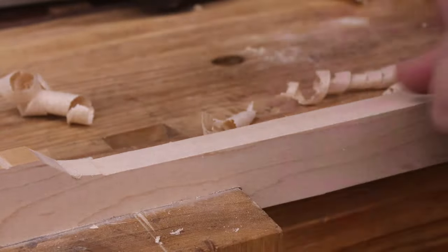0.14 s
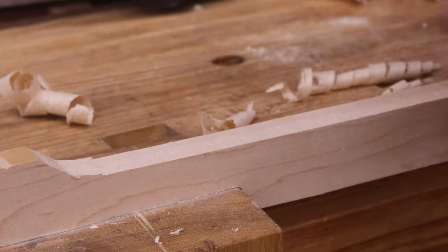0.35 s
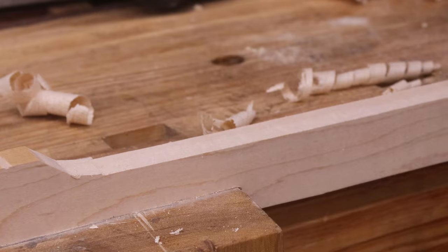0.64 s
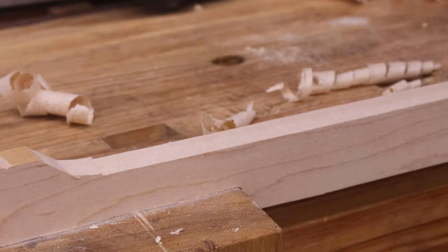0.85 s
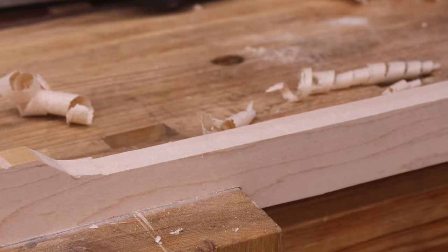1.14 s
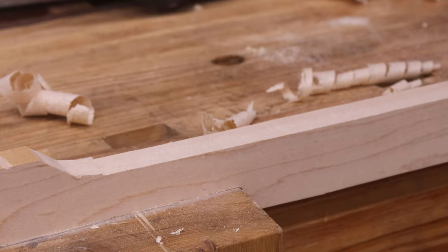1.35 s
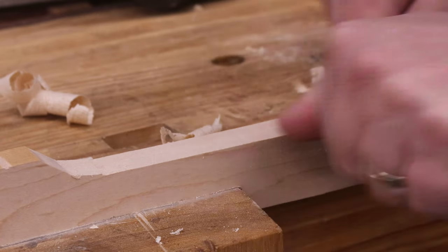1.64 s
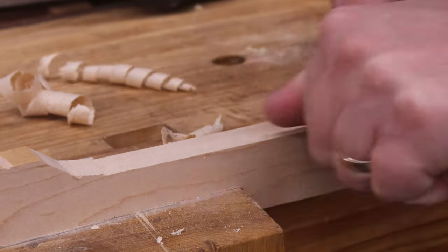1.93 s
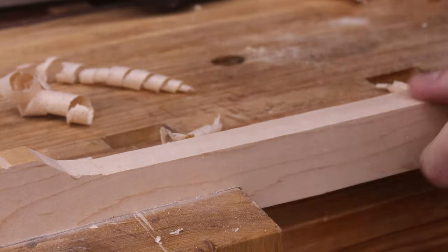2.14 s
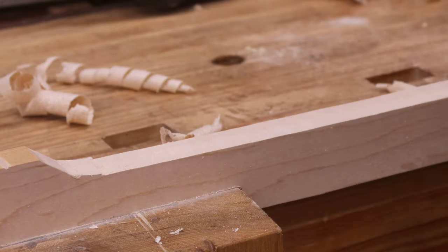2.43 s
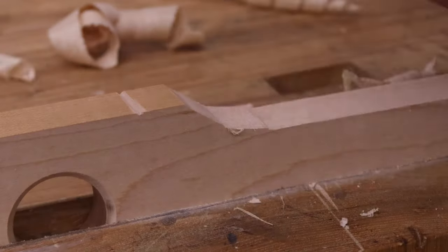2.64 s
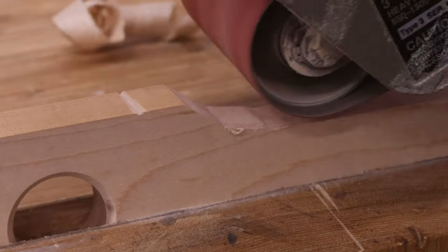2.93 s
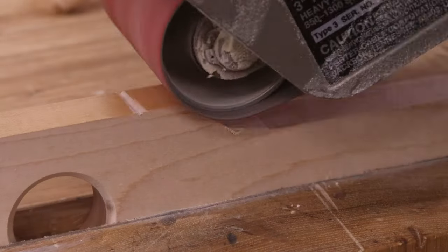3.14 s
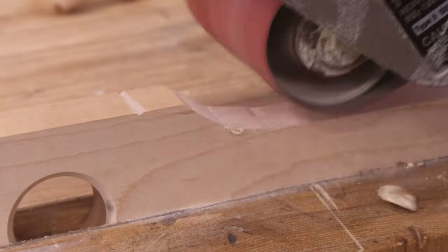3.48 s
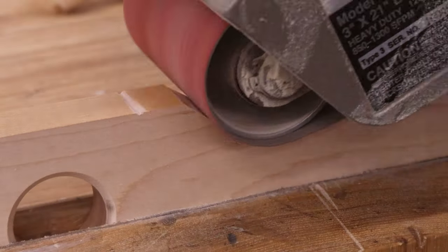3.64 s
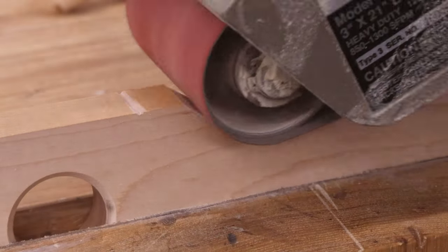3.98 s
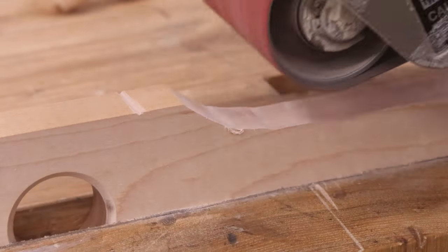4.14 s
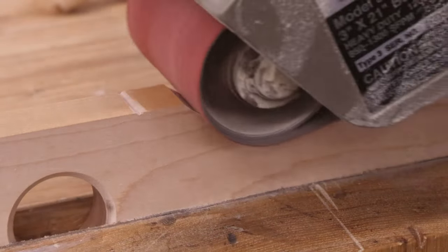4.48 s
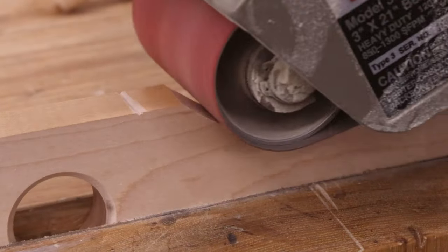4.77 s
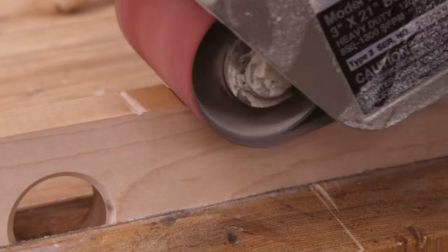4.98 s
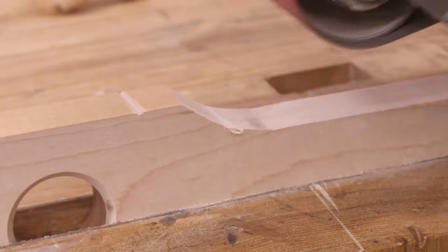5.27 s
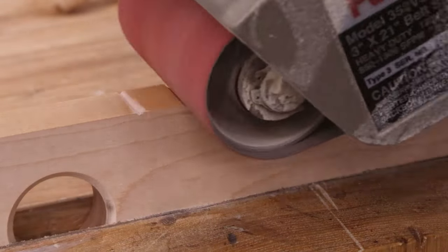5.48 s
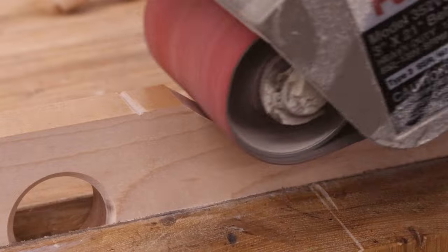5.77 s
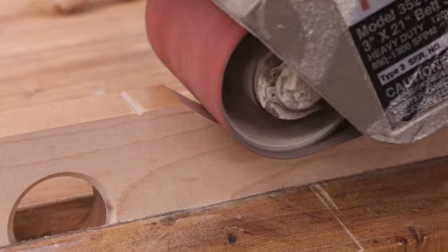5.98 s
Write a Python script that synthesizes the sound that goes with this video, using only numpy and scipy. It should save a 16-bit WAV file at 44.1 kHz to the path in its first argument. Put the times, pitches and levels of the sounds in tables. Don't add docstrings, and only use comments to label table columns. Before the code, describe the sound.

A hand blade scrapes and chatters wood shavings off a board, knocks down on the bench, then a belt sander clicks on and whines loudly.

```python
import sys
import numpy as np
from scipy import signal
from scipy.fft import rfft, irfft
from scipy.io import wavfile
from scipy.ndimage import uniform_filter1d

SR = 44100
rng = np.random.default_rng(int(sys.argv[2]) if len(sys.argv) > 2 else 0)


def voltage_ratio(level):
    return 10 ** (np.asarray(level, float) / 20)


def unload_wav(signal):
    wavfile.write(
        sys.argv[1],
        SR,
        np.round(np.clip(np.atleast_2d(signal).T, -1, 1) * 32767).astype(np.int16),
    )


N = 269451
TIME, FREQ = np.arange(N) / SR, np.fft.rfftfreq(N, 1 / SR) + 1
SWITCH_S = 2.8008


def unit(x):
    return x / np.sqrt(np.mean(x ** 2))


def colour(points):
    hz, db = np.transpose(points)
    return unit(voltage_ratio(np.interp(np.log(FREQ), np.log(hz), db)))


def ringing(modes):
    return sum(voltage_ratio(db) / (1 + 1j * (FREQ - hz * hz / FREQ) / max(width, 30)) for hz, width, db in modes)


def through(x, gain):
    return irfft(rfft(x) * gain, N)


def walk(rate):
    hold = int(SR / rate)
    steps = np.repeat(rng.standard_normal(N // hold + 1), hold)
    return unit(uniform_filter1d(uniform_filter1d(steps, hold), hold)[:N])


def fibres(rate, spread_db):
    hold = int(SR / rate)
    sizes = np.minimum(rng.exponential(size=N // hold + 1), 4)
    return unit(rng.standard_normal(N) * np.repeat(voltage_ratio(spread_db * sizes), hold)[:N])


# (start [s], length [s], cut level [dB], fibre hiss minus cut [dB], board boom minus cut [dB])
STROKES = [(0, 0.012, -50.5, -4, -12), (0.077, 0.21, -48, -9.5, 2), (0.17, 0.087, -44, -16, 6),
           (0.254, 0.085, -39.5, -13.5, -0.5), (0.451, 0.19, -42, -7, 2.5),
           (0.558, 0.097, -34.5, -12.5, -11), (0.734, 0.077, -31.5, -24, -11.5),
           (0.873, 0.057, -31.5, -17, -10), (0.938, 0.051, -32, -24, -14), (0.984, 0.14, -37.5, -17, -8),
           (1.158, 0.33, -40.5, -21, -4.5), (1.465, .2, -41, -18, -5.5), (1.693, 0.076, -37.5, -13.5, -5),
           (1.805, 0.15, -47.5, -6.5, 11.5), (1.916, 0.16, -34, -10, 2.5), (2.096, 0.2, -79, -18, 7),
           (2.342, 0.044, -63, 1, -16), (2.427, 0.068, -64.5, 4.5, -6), (2.602, 0.065, -53, -1, -1),
           (2.668, 0.084, -57.5, 0.5, -9)]
ATTACK_S, RELEASE_S, BUILD_DB = 0.024, 0.02, -0.5
HISS_ATTACK_SHARE, HISS_RELEASE_S = 0.3, .006
SPLINTER_DB, SPLINTER_SLOPE = 1.5, 1.7


def stroke_pressure():
    push = 0
    for start, length, cut_db, hiss_db, boom_db in STROKES:
        u = TIME - start
        slow = max(HISS_ATTACK_SHARE * length, ATTACK_S)
        attack = np.array([[ATTACK_S], [ATTACK_S], [slow], [slow]])
        release = np.array([[RELEASE_S], [RELEASE_S], [HISS_RELEASE_S], [HISS_RELEASE_S]])
        shape = np.clip(u / attack, 0, 1) * np.exp(-np.maximum(u - length, 0) / release)
        shape = shape * voltage_ratio(cut_db + BUILD_DB * (np.clip(u / length, 0, 1) - .5))
        splinter_db = SPLINTER_SLOPE * hiss_db + SPLINTER_DB
        drive_db = np.array([[boom_db - 4.5], [-4.0], [hiss_db + .5], [splinter_db]])
        push = np.hypot(push, voltage_ratio(drive_db) * shape)
    return push


# (peak time [s], level [dB], ring [Hz], half length [s])
CATCHES = [(0.075, -36.5, 890, 0.0043), (0.19, -40.5, 2780, 0.011), (0.229, -39, 3160, 0.0055),
           (0.279, -41, 2270, 0.0069), (0.31, -36.5, 1580, .0033), (0.337, -32.5, 560, 0.0056),
           (.345, -68, 3630, 0.0034), (0.362, -55, 3600, .002), (0.513, -51, 3600, .0015),
           (0.468, -39, 895, .0034), (0.529, -39, 1830, 0.0094), (0.555, -38, 2160, 0.0041),
           (0.61, -33, 2430, .003), (0.621, -28.5, 1580, 0.0039), (0.634, -31, 820, 0.0045),
           (0.777, -28.5, 2570, 0.0066), (0.8, -32.5, 1290, 0.0037), (1.76, -36, 820, 0.0059),
           (1.837, -34, 820, 0.013), (1.973, -40, 810, 0.016), (2.025, -32.5, 2160, 0.013),
           (2.08, -33.5, 760, .0062)]
# (peak time [s], level [dB], ring [Hz], half length [s])
CHATTER = [(0.868, -29, 820, 0.0038), (0.885, -29.5, 2060, 0.0034), (0.904, -32.5, 2450, 0.0034),
           (0.949, -27.5, 2570, 0.0017), (0.967, -31, 820, 0.0019), (1.002, -27.5, 2700, 0.0037),
           (1.054, -31.5, 820, 0.0026), (1.079, -24.5, 2540, 0.0024), (1.14, -31.5, 1600, .005),
           (1.175, -32, 1770, 0.006), (1.219, -36, 1670, 0.0023), (1.259, -32.5, 2470, 0.0075),
           (1.305, -33, 810, 0.0041), (1.347, -28.5, 2190, 0.0049), (1.404, -36.5, 1720, 0.0047),
           (1.438, -31, 1620, 0.0046), (1.484, -41, 850, .0036), (1.525, -28.5, 1850, 0.006),
           (1.566, -28.5, 2750, 0.0013), (1.615, -38.5, 860, 0.0052), (1.646, -38.5, 1390, .0059)]
# (peak time [s], level [dB], ring [Hz], half length [s])
KNOCKS = [
    (2.16, -64, 2310, 0.0027),
    (2.328, -48.5, 2760, 0.0034),
    (2.357, -44, 1050, 0.0033),
    (2.376, -41.5, 2350, 0.0017),
    (2.449, -53.5, 2500, 0.0048),
    (2.48, -58, 4600, 0.0065),
    (2.568, -53, 3770, 0.0079),
    (2.628, -35, 1450, 0.0014),
    (2.64, -47.5, 3150, 0.0035),
    (2.714, -48, 2750, 0.004),
]
# (frequency [Hz], width [Hz], level [dB])
BOARD = [(154.3, 23, 5), (253, 24, 2.5), (411, 11, -10.5), (511, 72, -2.5), (820, 87, 3), (983, 40, 2),
         (1636, 230, -8), (2190, 66, -6), (2700, 160, -10.5), (3580, 260, 4.5)]
# (frequency [Hz], level [dB])
BOOM = [(40, -17), (95, -8.5), (150, -12), (250, -6), (500, -1.5), (800, -55), (1500, -67)]
# (frequency [Hz], level [dB])
CUT = [(300, -30), (600, 2), (900, -4), (1600, 1.5), (2700, 1), (3400, -16), (5000, -28)]
# (frequency [Hz], level [dB])
HISS = [(2000, -3), (3500, 4.5), (5000, 1.5), (8000, -13.5), (11000, -50)]
# (frequency [Hz], level [dB])
AIR = [(6000, -7), (9000, 2.5), (12000, -4), (16000, -7.5)]
CATCH_BOOM_DB, KNOCK_BOOM_DB = -7.5, -18
CATCH_HISS_DB, HISS_DB_PER_OCT = -13, 16.5
RING_DB, RING_WIDTH, BOARD_MIX = -5, .08, .3


def spokeshave():
    push = stroke_pressure() * voltage_ratio(2.3 * walk(45))
    tear, rings = fibres(rate=1600, spread_db=0.9), np.zeros(N)
    for table, boom_db in ((CATCHES, CATCH_BOOM_DB), (CHATTER, CATCH_BOOM_DB), (KNOCKS, KNOCK_BOOM_DB)):
        for peak, db, hz, length in table:
            span = slice(int((peak - .05) * SR), int((peak + 0.13) * SR))
            u = (TIME[span] - peak) / max(length, .001)
            swell = np.exp(-np.where(u < 0, u, 0.39 * u) ** 2 / 2)
            crisp = np.exp(-np.where(u < 0, u, 0.57 * u) ** 2 / 2)
            hiss_db = db + CATCH_HISS_DB + HISS_DB_PER_OCT * np.log2(hz / 2500)
            drive_db = np.array([[db + boom_db - .5], [db - 3.0], [hiss_db + .5], [hiss_db - 9.5]])
            swells = np.array([swell, swell, crisp, crisp])
            push[:, span] = np.hypot(push[:, span], voltage_ratio(drive_db) * swells)
            b, a = signal.iirpeak(hz, 1 / RING_WIDTH, SR)
            rings[span] += voltage_ratio(db + RING_DB) * unit(signal.lfilter(b, a, tear[span])) * swell
    body = ringing(BOARD)
    body = body + BOARD_MIX * np.abs(body).max()
    boom, cut = colour(BOOM) * body, colour(CUT) * body
    boom = boom / np.sqrt(np.mean(np.abs(boom) ** 2))
    cut = cut / np.sqrt(np.mean(np.abs(cut) ** 2))
    snaps = fibres(rate=2500, spread_db=2.7)
    hiss = through(push[2] * snaps, colour(HISS))
    splinters = through(push[3] * snaps, colour(AIR))
    return through(push[0] * tear, boom) + through(push[1] * tear, cut) + hiss + splinters + rings


# (time [s], commutator rate once at speed [Hz], whine level [dB])
MOTOR = [(3.0, 3858, -40), (3.3, 3862, -45.5), (3.5, 3818, -49), (3.6, 3900, -43), (3.7, 3965, -39.5),
         (4.1, 3800, -48.5), (4.2, 3923, -41), (4.3, 3940, -40.5), (4.6, 3800, -52.5), (4.7, 3888, -41),
         (4.8, 3954, -40), (5.3, 3670, -51), (5.35, 3830, -40), (5.42, 3890, -44), (5.5, 3944, -49),
         (5.65, 3833, -41), (5.82, 3960, -45), (6.11, 3778, -41.5)]
# (level at free speed [dB], slope [dB per 100 Hz], added by starting current [dB])
WHINE = [(-56.5, 2, -5), (-64, 3.5, 1)]
RUN_UP_FROM_S, RUN_UP_S, FREE_HZ = 2.747, .142, 3858
TEETH_DB, TEETH_DB_PER_100HZ, TEETH_START_DB = -33.5, -1.8, -6
HOUSING_HZ, HOUSING_WIDTH_HZ, HOUSING_DB = 7364, 177, 7.8


def motor():
    reached = np.tanh(np.maximum(TIME - RUN_UP_FROM_S, 0) / RUN_UP_S)
    times, speeds, levels = np.transpose(MOTOR)
    speed_hz = np.interp(TIME, times, speeds)
    bar_hz = speed_hz * reached
    over = (speed_hz - FREE_HZ) / 100
    starting = 1 - reached ** 8
    whine_db = [np.interp(TIME, times, levels)]
    for harmonic, (db, slope, start_db) in enumerate(WHINE, 2):
        lift = HOUSING_DB * np.exp(-((harmonic * bar_hz - HOUSING_HZ) / HOUSING_WIDTH_HZ) ** 2)
        wander = 2.8 * walk(8)
        whine_db.append(db + slope * over + start_db * starting + wander + lift)
    tooth_db = TEETH_DB + TEETH_DB_PER_100HZ * over + TEETH_START_DB * (1 - reached ** 2)
    return bar_hz, whine_db, tooth_db


def tone(hz, db, flicker_db, wobble=.3):
    phase = 2 * np.pi * np.cumsum(hz) / SR + wobble * walk(120)
    return np.sqrt(2) * voltage_ratio(db + flicker_db * walk(55)) * np.sin(phase)


# (order [per turn], level [dB])
SHAFT = [(1, -62), (2, -53), (3, -51), (4, -51), (5, -52), (6, -55), (10, -52), (11, -56), (13, -57),
         (22, -64)]
BARS, TEETH = 12, 16 / 3
WHINE_FLICKER_DB = 2.6


def motor_lines():
    bar_hz, whine_db, tooth_db = motor()
    whine = sum(tone(k * bar_hz, db, WHINE_FLICKER_DB) for k, db in enumerate(whine_db, 1))
    shaft_hz = bar_hz / BARS
    tooth_hz = shaft_hz * TEETH
    teeth = tone(tooth_hz, tooth_db - 0.5, 1.27) + tone(2 * tooth_hz, tooth_db - 29.0, 3.04)
    rattle_db = 7 * np.exp(-((TIME - 2.95) / .1) ** 2)
    shaft = sum(tone(order * shaft_hz, db - 3.5 + rattle_db, WHINE_FLICKER_DB, .15) for order, db in SHAFT)
    return (whine + teeth) * np.clip((TIME - 2.82) / .1, 0, 1) + shaft * np.clip((TIME - 2.84) / .08, 0, 1)


# (frequency [Hz], level [dB])
ROAR_COLOUR = [(18, -78), (30, -51), (319, -24.5), (384, -21), (649, -15), (702, -13.5), (962, -11.5),
               (1070, -13.5), (1390, -11), (1670, -4.5), (1860, -6), (2410, -3.5), (3580, -16),
               (12000, -33), (16000, -39.5)]
ROAR_DB, SURGE_DB, SURGE_S, SURGE_TOP_DB = -36, 9, 0.14, -29
GRIT_LAG_S = 0.038


def roar():
    after = TIME - SWITCH_S
    db = ROAR_DB + SURGE_DB * np.exp(-np.maximum(after, 0) / SURGE_S)
    db = np.minimum(db, SURGE_TOP_DB)
    high = 1 / (1 + (3800 / FREQ) ** 6)
    total = 0
    for share, rise in ((1 - high, 1), (high, np.clip(after / GRIT_LAG_S, .3, 1))):
        grit = through(fibres(rate=3000, spread_db=1.35), colour(ROAR_COLOUR) * share)
        total = total + rise * grit * voltage_ratio(.5 * walk(14))
    return voltage_ratio(db + 3.5) * total


# (frequency [Hz], width [Hz], level [dB])
SWITCH_MODES = [(750, 400, -10), (1600, 450, 0), (2300, 800, -3), (6000, 2500, -16)]


def switch_click():
    u = TIME - SWITCH_S
    snap = (u > 0) * np.exp(-np.abs(u) / .004) * rng.standard_normal(N)
    click = through(snap, ringing(SWITCH_MODES) ** 2)
    return voltage_ratio(-13.5) * click / np.abs(click).max()


def sander():
    shake = unit(through(rng.standard_normal(N), ringing([(158, 70, 0)]) ** 2))
    rumble = voltage_ratio(-70 + 2.5 * walk(9)) * shake
    on = np.clip((TIME - 2.792) / 0.0082, 0, 1)
    return on * (motor_lines() + rumble + roar()) + switch_click()


def thud():
    start_s, db, hz, rise_s, lead_rad = 2.347, -32, 46, .012, 1.0
    u = np.maximum(TIME - start_s, 0)
    leads = np.array([[lead_rad], [-lead_rad - np.pi / 2]])
    return voltage_ratio(db) * np.sin(2 * np.pi * hz * u + leads) * u / rise_s * np.exp(-u / rise_s)


# (frequency [Hz], level [dB])
SHOP = [(18, -38), (30, -13), (913, -16.5), (1130, -19.5), (2410, -15), (9220, -28.5), (11100, -28),
        (16000, -44)]


def shop():
    dip = 1 - .85 * np.exp(-((TIME - 2.295) / .03) ** 2)
    air = through(rng.standard_normal(N), colour(SHOP))
    return dip * voltage_ratio(-59.5 + 0.5 * walk(5.4)) * air * (TIME < SWITCH_S)


# (lower edge [Hz], edge slide [Hz/s], lead [rad])
LEADS = [(0, 0, 1.1), (1150, 0, .4), (1500, 200, 1.7), (3350, -150, 3.6), (4100, 0, 4.3), (5300, 0, 4.8)]
# (from [s], to [s], low [Hz], high [Hz], slide [Hz/s])
ALIGNED = [(0, .36, 3250, 4000, 0), (.4, .48, 8000, 23000, 0), (.73, .96, 8500, 23000, 0),
           (1.2, 1.35, 8000, 23000, 0), (.45, 2.1, 700, 1150, 0), (1.05, 2.1, 220, 700, 0),
           (2.1, 2.6, 3000, 4100, 0), (2.45, 2.6, 4600, 23000, 0)]
# (from [s], to [s], low [Hz], high [Hz], slide [Hz/s])
ASKEW = [(.07, .2, 5300, 10000, 0), (.45, .62, 3400, 4200, 0), (1.92, 2.12, 1900, 3100, -1000),
         (2.4, 2.47, 500, 1200, 0)]
# (from [s], to [s], low [Hz], high [Hz], slide [Hz/s])
OPPOSED = [(.74, 1.2, 1130, 1400, -1450), (1.25, 1.56, 700, 930, -200), (1.9, 2.1, 7000, 7900, 3500),
           (2.08, 2.2, 12000, 23000, 0), (2.2, 2.28, 4400, 5200, 0), (2.33, 2.6, 3800, 4300, -2000),
           (2.8, 2.9, -300, 480, -1800)]
STEREO_END_S, ALIGNED_RAD, ASKEW_RAD, OPPOSED_RAD = 2.6, .4, 2.7, 3.14


def drifting_stereo(x):
    hz, s, frames = signal.stft(x, SR, nperseg=512, noverlap=384)
    hz, lead = hz[:, None], np.zeros(frames.shape)
    for edge_hz, slide, radians in LEADS:
        lead[(hz >= edge_hz + slide * s) & (s < STEREO_END_S)] = radians
    for rows, radians in ((ALIGNED, ALIGNED_RAD), (ASKEW, ASKEW_RAD), (OPPOSED, OPPOSED_RAD)):
        for start, end, low_hz, high_hz, slide in rows:
            moved = hz - slide * (s - start)
            lead[(s >= start) & (s < end) & (moved >= low_hz) & (moved < high_hz)] = radians
    shake = uniform_filter1d(rng.standard_normal(frames.shape), size=3, axis=0)
    shake = uniform_filter1d(shake, size=5, axis=1)
    jitter = .6 * (.25 + np.abs(np.cos(lead / 2)))
    lead += jitter * unit(shake) * np.minimum(hz / 3000, 1) * (s < STEREO_END_S)
    sides = frames * np.exp(.5j * np.array([lead, -lead]))
    return signal.istft(sides, SR, nperseg=512, noverlap=384)[1][:, :N]


def scene():
    return drifting_stereo(spokeshave() + sander() + shop()) + thud()


def roll_off(x):
    return signal.sosfilt(signal.butter(12, 16240, fs=SR, output="sos"), x)


def record(dry):
    top = np.fft.rfftfreq(N, 1 / SR) < 15830
    return roll_off(through(dry, top))


dry = scene()
out = record(dry)
unload_wav(out)
```